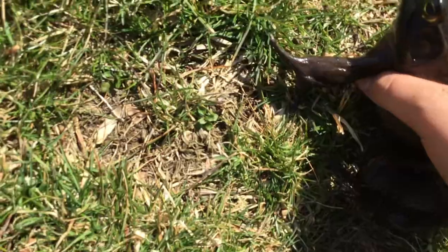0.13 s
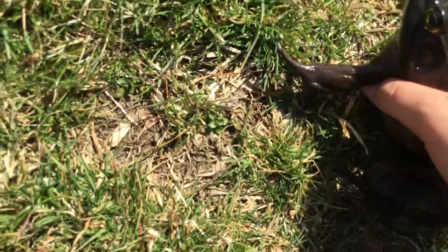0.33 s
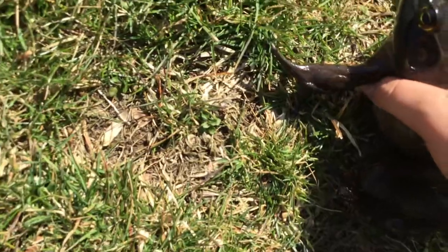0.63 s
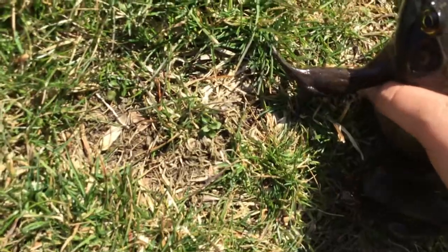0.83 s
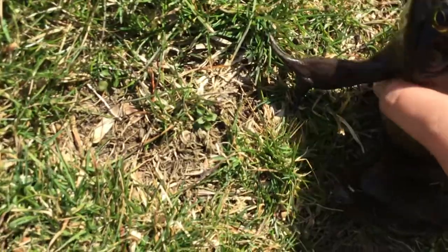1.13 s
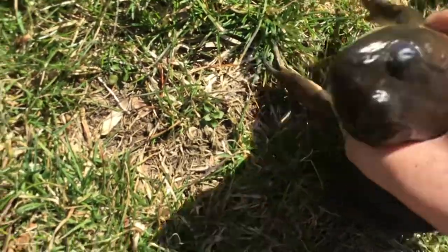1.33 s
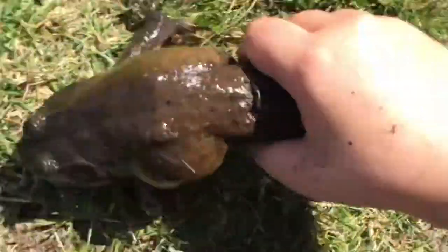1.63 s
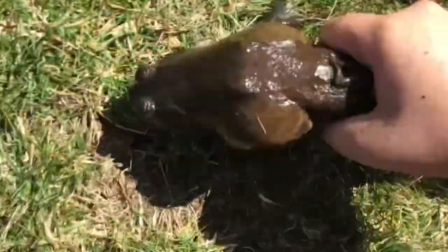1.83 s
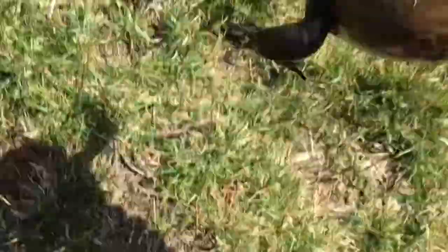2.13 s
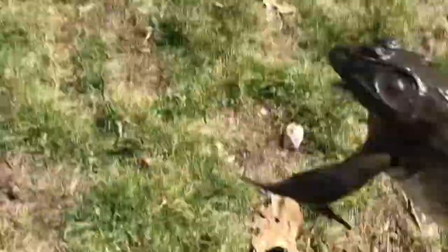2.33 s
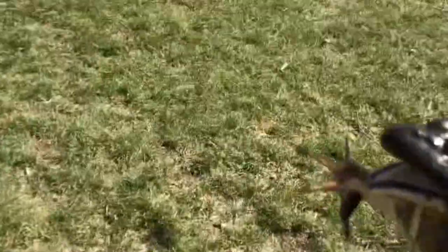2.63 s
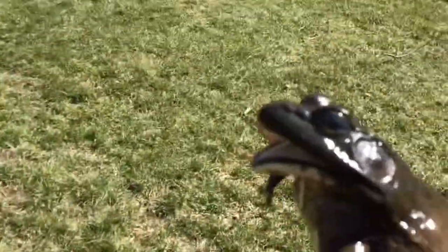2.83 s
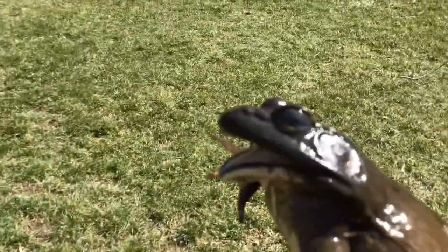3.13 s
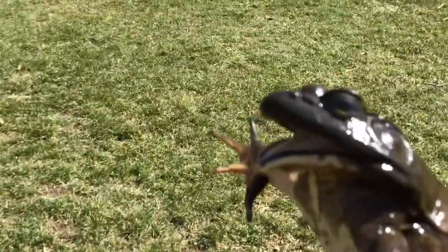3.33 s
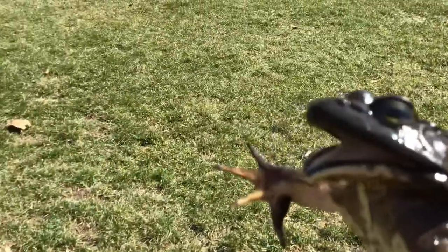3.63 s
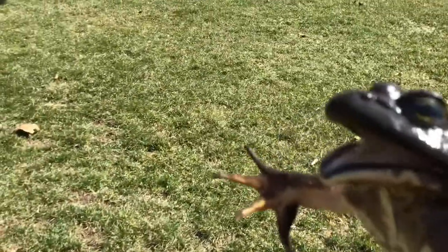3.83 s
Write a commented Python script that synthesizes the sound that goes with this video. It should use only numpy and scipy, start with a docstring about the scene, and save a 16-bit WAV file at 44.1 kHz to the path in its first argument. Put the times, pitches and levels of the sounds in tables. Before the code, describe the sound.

A bullfrog grunts and mutters, then lets out a long, loud, rasping cry.

```python
"""Over a lawn lie a low rumble, a faint hiss and a hum. Fingers bump the camera, each blow an impulse
that its body damps at once, as a hand-held bullfrog is lifted. The frog grunts, mutters, then opens its
mouth into a long rasping cry. The cry is a source-filter sound: a train of larynx snaps excites the
resonances of throat and mouth. It turns ragged, then drops to a clean double-pulsed tone."""
import sys
import numpy as np
from scipy import signal
from scipy.fft import rfft, irfft
from scipy.io import wavfile
from scipy.ndimage import uniform_filter1d

SR = 44100
rng = np.random.default_rng(int(sys.argv[2]) if len(sys.argv) > 2 else 0)


def waveform_to_disk(signal):
    """Save audio, clipped to [-1, 1], as 16-bit WAV at the path in sys.argv[1]."""
    frames = np.transpose(np.atleast_2d(signal))
    scaled = np.clip(frames, -1, 1) * 32767
    samples = np.round(scaled).astype(np.int16)
    wavfile.write(sys.argv[1], SR, samples)


N = 176400


def amp(db):
    """Amplitude ratio: a factor of ten per 20 dB."""
    return 10 ** (np.asarray(db) / 20)


def curve(points, s, column=1):
    """Linear interpolation of one column of a time table."""
    table = np.array(points, float)
    return np.interp(s, table[:, 0], table[:, column])


def spectrum(points, hz):
    """Magnitude response: decibels interpolated over log frequency, returned as gain."""
    f, db = np.transpose(points)
    return amp(np.interp(np.log(hz + 1), np.log(f + 1), db))


def unit_rms(x):
    """Normalisation to unit mean power."""
    return x / np.sqrt(np.mean(x ** 2) + 1e-20)


def steadied(x, size=2200):
    """Normalisation by running rms, slow enough to keep the single pulses."""
    power = abs(uniform_filter1d(uniform_filter1d(x ** 2, size), size))
    return x / np.sqrt(power + 1e-4 * power.mean())


def impulse_response(points, size=4096):
    """Minimum-phase response: the phase follows from the log gain by the Hilbert transform."""
    log_gain = np.log(spectrum(points, abs(np.fft.fftfreq(size, 1 / SR))))
    return np.fft.ifft(np.exp(np.conj(signal.hilbert(log_gain)))).real[:size // 2]


def filtered(x, points):
    """Linear filtering: convolution with a body's impulse response."""
    return signal.oaconvolve(x, impulse_response(points))[:N]


def resonate(x, hz, width_hz):
    """Moving resonance: a double pole acts on the signal shifted down by the centre frequency."""
    carrier = np.exp(2j * np.pi * np.cumsum(hz * np.ones(N)) / SR)
    r = np.exp(-np.pi * width_hz / SR)
    return 2 * (carrier * signal.lfilter([(1 - r) ** 2], [1, -2 * r, r * r], x / carrier + 1e-18)).real


def impulses(times, sizes, order=8):
    """Band-limited impulses: windowed sincs placed between the samples."""
    at = times[:, None] * SR
    taps = np.floor(at).astype(int) + np.arange(1 - order, order + 1)
    shape = np.sinc(taps - at) * np.cos(np.pi * (taps - at) / (2 * order)) ** 2
    return np.bincount(taps.ravel(), (sizes[:, None] * shape).ravel(), N)[:N]


def noise(points):
    """Spectral shaping of white noise, at unit rms."""
    white = rfft(rng.standard_normal(N))
    return unit_rms(irfft(white * spectrum(points, np.fft.rfftfreq(N, 1 / SR)), N))


def scatter(decay_s, db, size=1500):
    """Diffuse response: a direct impulse and an exponentially decaying random tail."""
    t = np.arange(size) / SR
    tail = rng.standard_normal(size) * np.exp(-t / decay_s) * (1 - np.exp(-2 * t / decay_s))
    return (t == 0) + amp(db) * tail / np.linalg.norm(tail)


# Spectral densities of the background (frequency [Hz], relative level [dB])
RUMBLE_SPECTRUM = [(20, -42), (40, -4), (65, 1.5), (100, 2), (170, -3.5), (280, -10.5), (450, -19),
                   (800, -31), (2000, -59)]
HISS_SPECTRUM = [(100, 10.5), (500, -2), (800, -5), (1400, 3.5), (2200, -1), (2600, 3.5), (2930, 12.5),
                 (3400, -3.5), (4300, -0.5), (5500, -18), (8000, -20), (16000, -38)]
# Envelope of the rumble (time [s], level [dB])
RUMBLE_LEVEL = [(0, -43.5), (.2, -50.5), (.6, -52.5), (1.0, -49), (1.4, -44.5), (1.7, -44.5), (2.0, -38.5),
                (2.3, -47), (2.6, -49), (2.9, -56), (3.55, -59), (3.7, -52), (3.8, -56.5), (4.0, -58)]


def outdoors(t, hiss_db=-67, hum_hz=112.5, hum_db=-59):
    """Superposition of two noises, rumble and hiss, and a distant hum of two harmonics."""
    phase = 2 * np.pi * hum_hz * t
    hum = amp(hum_db) * unit_rms(np.sin(phase) + amp(-6.5) * np.sin(2 * phase))
    rumble = noise(RUMBLE_SPECTRUM) * amp(curve(RUMBLE_LEVEL, t))
    return rumble + amp(hiss_db) * noise(HISS_SPECTRUM) + hum


# Band gains of each finger blow (time [s], thump [dB], knock [dB], tick [dB], snap [dB], top [dB])
FINGER_BLOWS = [(0.391, -23, -16.5, -21.5, -32.5, -54), (0.726, 15.5, 8.5, -34, -52, -64),
                (0.743, 13.5, 0.5, 1, -24, -74), (0.881, -7, -35, -26, -57, -63),
                (1.02, 4, -3, -15, -17.5, -41), (1.085, 25.5, -4, -54, -48, -61),
                (1.45, 8, -5, -53, -44, -63), (1.476, -4, -12.5, 1.5, -5.5, -40.5),
                (1.518, -4, 4, -35, -42, -64), (1.556, 4, -28, -7, -14.5, -44),
                (1.607, 20, 5.5, -5, -33, -79), (1.62, 22, -1, -21, -56, -62),
                (1.654, 11, 13.5, 4.5, 2, -23.5), (1.926, 15.5, 17.5, -3.5, -5.5, -36.5),
                (2.056, 24.5, 3.5, -7, -24, -40), (2.065, 33, 26.5, -1, -21, -44),
                (2.124, 7, -0.5, -3.5, -26, -52), (2.193, -1, 10, -13, -31, -54),
                (2.22, 19, -6.5, -17, -36, -52), (2.532, 31, 31.5, 13, 13, -7),
                (2.595, 22.5, 24, -5.5, -11, -60), (2.688, 7.5, -8.5, -10, -11, -49)]


def finger_bumps(grip_s=(1.6, 1.64), lead_s=.00027):
    """Impact excitation: the damped camera shell chatters after each blow, longer as the grip shifts."""
    out = np.zeros(N)
    for s, thump, knock, tick, snap, top in FINGER_BLOWS:
        bands = [(25, thump - 53), (75, thump - 2.5), (170, thump), (560, knock),
                 (2100, tick), (5000, snap), (10000, top), (16000, top - 2.5)]
        gripping = grip_s[0] < s < grip_s[1]
        chatter = scatter(decay_s=.0035, db=-3) if gripping else scatter(decay_s=.00096, db=-7.5)
        blow = signal.fftconvolve(impulse_response(bands), chatter)
        span = out[round((s - lead_s) * SR):][:len(blow)]
        span += blow[:len(span)]
    return out


# Lone larynx snaps (time [s], strength [dB])
GRUNT_SNAPS = [(1.328, -7.5), (1.347, -8), (1.363, -8.5), (1.382, -16), (1.391, -14.5), (1.4, -21)]
# Response of the closed vocal tract (frequency [Hz], gain [dB])
GRUNT_RESPONSE = [(100, -7), (350, 12.5), (700, -4), (1150, -1), (1500, -15), (2000, -29), (5000, -51)]


def grunts():
    """Impulse excitation: a few snaps ring the cavity behind a closed mouth."""
    s, db = np.transpose(GRUNT_SNAPS)
    return filtered(impulses(s, amp(db)), GRUNT_RESPONSE)


def clean_register(s, change_s=3.6, lasting_s=.029):
    """Register transition: 0 in the ragged voice, 1 in the clean one."""
    return np.clip((s - change_s) / lasting_s + .5, 0, 1)


def reflected(x, t, db, count=8):
    """Early reflections from hand and ground, cross-faded as the frog is moved about."""
    place = t / t[-1] * (count - 1)
    shares = (np.clip(1 - abs(place - k), 0, 1) for k in range(count))
    return sum(signal.oaconvolve(x * share, scatter(decay_s=.005, db=db))[:N] for share in shares)


# Fundamental of the voice (time [s], snap rate [Hz])
SNAP_RATE = [(1.68, 134), (1.75, 149.8), (1.85, 128.2), (1.97, 167.4), (2.1, 165.5), (2.18, 187.5),
             (2.25, 236.4), (2.34, 244.1), (2.44, 234.1), (2.52, 242.7), (2.73, 250.1), (3.15, 249),
             (3.37, 243.3), (3.41, 223.1), (3.575, 226.9), (3.62, 190), (3.8, 181.8), (3.87, 178.6),
             (4.0, 176.4)]
# Unevenness of the snaps (time [s], jitter [ms], long-short alternation [ms], shimmer [dB])
ROUGHNESS = [(1.7, .4, 0, 1.5), (1.9, .7, 0, 2), (2.17, .55, 0, 1.6), (2.3, .15, .02, 1.2),
             (2.5, .07, .03, 1), (2.65, .04, .06, .8), (2.85, .065, .06, 1), (3.15, .14, .04, 1.2),
             (3.35, .17, .04, 1.2), (3.44, .3, .03, 1.2), (3.57, .26, 0, 1.2), (3.63, .03, 0, .45),
             (3.78, .022, 0, .4), (4.0, .035, 0, .5)]
# Air in the snaps (time [s], amplitude relative to the snaps [ratio])
BREATH_SHARE = [(1.7, 1.3), (2.2, .8), (2.45, .45), (2.8, .4), (3.5, .5), (3.65, .35), (4.0, .45)]


def larynx(t, start_s, count=1000):
    """Pulse source with jitter and shimmer: an even low drive and a wilder, airy bright one."""
    late, strong, sharp, lag, slip = rng.standard_normal((count, 5)).T
    air = rng.standard_normal(N)
    # the pitch wanders at random, 22 and 90 steps a second
    waver = .006 * np.interp(t * 22, np.arange(count), rng.standard_normal(count))
    drift = .11 * curve(ROUGHNESS, t) * np.interp(t * 90, np.arange(count), rng.standard_normal(count))
    cycles = np.cumsum(curve(SNAP_RATE, t) * (1 + waver + drift) * (t > start_s)) / SR
    k = np.arange(1, int(cycles[-1]) + 1)
    snap_s = np.interp(k, cycles, t)  # one snap a cycle
    alternate = np.cos(np.pi * k)
    jitter_ms, alternation_ms, shimmer_db = (curve(ROUGHNESS, snap_s, column) for column in (1, 2, 3))
    snap_s += (jitter_ms * late[k] + alternation_ms * alternate) / 1000
    # a reversed snap follows each one, later and stronger in the clean register
    clean = clean_register(snap_s)
    rebound_s = snap_s + np.interp(clean, [0, 1], [.000591, .00154]) + .5 * jitter_ms * lag[k] / 1000
    size = amp(shimmer_db * strong[k])
    low = impulses(snap_s, size) - impulses(rebound_s, size * np.interp(clean, [0, 1], [.14, .4]))

    delay_s, slip_s, puff_decay_s = .00024, .00004, .0006
    bright_size = size * amp(1.2 * shimmer_db * sharp[k] + 2.2 * alternate * (1 - clean))
    rebound_size = bright_size * np.interp(clean, [0, 1], [.5, .78])
    snaps = impulses(snap_s + delay_s, bright_size)
    rebounds = impulses(rebound_s + delay_s + slip_s * slip[k], rebound_size)
    puffs = air * signal.lfilter([1], [1, -np.exp(-1 / (puff_decay_s * SR))], snaps + rebounds)
    bright = unit_rms(snaps - rebounds) + curve(BREATH_SHARE, t) * unit_rms(puffs)
    return reflected(low, t, db=-19), reflected(bright, t, db=-10)


# Throat responses: muttering, mouth shut, mouth open, clean register (frequency [Hz], gain [dB])
THROAT_MUTTER = [(100, -5), (300, -12), (480, 4.5), (620, -3.5), (760, 7), (1000, -11), (1300, 2),
                 (1620, -16), (1900, -26.5), (5000, -52)]
THROAT_SHUT = [(100, -32), (250, -13.5), (450, -2.5), (720, 6.5), (1000, -1), (1350, -4.5), (1680, 6),
               (2000, -13), (2600, -6), (3500, -32), (8000, -63)]
THROAT_OPEN = [(100, -25), (250, -13), (370, -9), (490, 1.5), (750, 2), (1000, -3.5), (1500, -1),
               (1950, -4), (2400, -1), (3000, -11.5), (4400, -34), (9000, -63)]
THROAT_CLEAN = [(100, -27), (180, -15), (360, -6.5), (540, -8), (730, 9), (920, 0), (1300, -3), (1650, -5),
                (2000, -8), (2400, -14.5), (2950, -9.5), (4400, -26), (9000, -39)]


def throat(drive, t, gape, clean, mutter_end_s=1.98):
    """Formant filtering: the drive passes through four shapes of the throat in turn."""
    muttering = t < mutter_end_s
    return (filtered(drive * muttering, THROAT_MUTTER)
            + filtered(drive * ~muttering * (1 - gape), THROAT_SHUT)
            + filtered(drive * gape * (1 - clean), THROAT_OPEN)
            + filtered(drive * clean, THROAT_CLEAN))


# Mouth resonance (time [s], frequency [Hz])
MOUTH_FORMANT = [(1.975, 1480), (2.0, 2096), (2.05, 3180), (2.12, 3290), (2.33, 3380), (2.5, 3710),
                 (2.95, 3756), (3.5, 3790), (3.7, 3600), (4.0, 3420)]


def mouth(drive, t, gape):
    """Cavity resonance: it rises and broadens as the jaw opens."""
    hz = curve(MOUTH_FORMANT, t)
    narrow = resonate(drive * (1 - gape), hz, width_hz=447)
    broad = resonate(drive * (gape + .6 * (1 - gape)), hz, width_hz=1036)
    return narrow + broad


# Upper resonance (time [s], frequency [Hz])
RASP_FORMANT = [(1.7, 6740), (2.1, 6350), (2.4, 5750), (2.9, 5777), (3.5, 5920), (3.7, 6242), (4.0, 6450)]
# Passband of the rasp (frequency [Hz], gain [dB])
RASP_BAND = [(2000, -23), (4000, -19), (4700, -1.5), (6500, -1), (7200, -1.5), (8200, -2), (12000, -34.5)]


def rasp(drive, t):
    """Parallel resonances: a gliding one and a steady lower one of opposite sign."""
    upper = resonate(drive, curve(RASP_FORMANT, t), width_hz=800)
    lower = amp(-7) * resonate(drive, hz=5050, width_hz=833)
    return filtered(upper - lower, RASP_BAND)


# Top-band responses in the ragged and clean registers (frequency [Hz], gain [dB])
SIZZLE_RAGGED = [(3000, -35), (7500, -26), (9400, -5.5), (10500, -4), (12000, 0.5), (13200, 5.5),
                 (14500, -9), (16000, -3)]
SIZZLE_CLEAN = [(3000, -50), (7500, -3), (9500, 2), (10600, -5), (12000, -4), (13300, -2), (14500, -13.5),
                (16000, -21)]


def sizzle(drive, clean):
    """High-frequency filtering: the top peaks of the voice shift with the register."""
    return filtered(drive * (1 - clean), SIZZLE_RAGGED) + filtered(drive * clean, SIZZLE_CLEAN)


# Band levels of the cry (time [s], throat [dB], mouth [dB], rasp [dB], sizzle [dB])
CRY_LEVELS = [(1.69, -54, -66, -87, -93), (1.755, -40, -76, -80, -92), (1.82, -47, -73, -79, -98),
              (1.89, -51.5, -68, -74, -92), (1.96, -47.5, -46.5, -67, -91), (2.02, -46.5, -39, -68, -84),
              (2.16, -45.5, -44.5, -80, -91), (2.25, -45, -45, -65.5, -91), (2.38, -40, -43.5, -60.5, -86),
              (2.49, -38, -39.5, -59.5, -79), (2.64, -40, -40, -55.5, -68.5),
              (2.75, -37.5, -35, -45.5, -63), (2.84, -34.5, -31.5, -34.5, -54.5),
              (3.0, -34, -32.5, -31, -55.5), (3.17, -34, -33.5, -33.5, -57), (3.55, -33, -31.5, -33, -59.5),
              (3.68, -34, -32.5, -32, -58), (3.85, -33, -32.5, -32.5, -55), (3.98, -33, -30.5, -32, -47.5)]


def cry(t, start_s=1.695, rise_s=.04, half_open_s=2.72, opening_s=.3):
    """Source-filter voice: the larynx drives four bands, each with its own envelope."""
    low, bright = larynx(t, start_s)
    gape = np.clip((t - half_open_s) / opening_s + .5, 0, 1)
    clean = clean_register(t)
    bands = throat(low, t, gape, clean), mouth(bright, t, gape), rasp(bright, t), sizzle(bright, clean)
    voice = sum(steadied(band) * amp(curve(CRY_LEVELS, t, k)) for k, band in enumerate(bands, 1))
    return voice * np.clip((t - start_s) / rise_s, 0, 1)


def scene():
    """Superposition of lawn, hand and frog, in mono."""
    t = np.arange(N) / SR
    return (outdoors(t) + finger_bumps() + grunts() + cry(t))[None]


def record(dry, lag_cycles=.63, corner_hz=59, start_s=.069, rise_s=.0051, cutoff_hz=16000):
    """Dispersion: the microphone delays the bass; the sound then fades in, clips and is band-limited."""
    hz = np.fft.rfftfreq(2 * N, 1 / SR)
    lag = np.exp(-2j * np.pi * lag_cycles * np.log(1 + hz / corner_hz))
    dispersed = irfft(rfft(dry, 2 * N) * lag)[:, :N]
    fade_in = np.clip((np.arange(N) / SR - start_s) / rise_s, 0, 1)
    lowpass = signal.firwin(511, cutoff_hz, window=("kaiser", 9), fs=SR)
    return signal.oaconvolve(np.clip(dispersed * fade_in, -1, 1), lowpass[None], "same")


dry = scene()
out = record(dry)
waveform_to_disk(out)
```